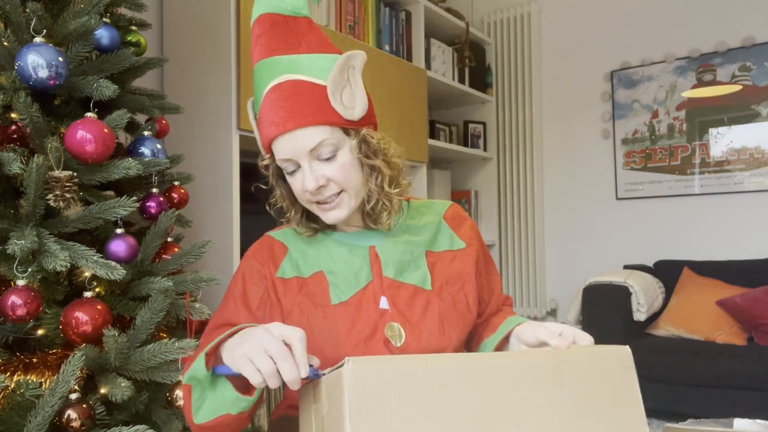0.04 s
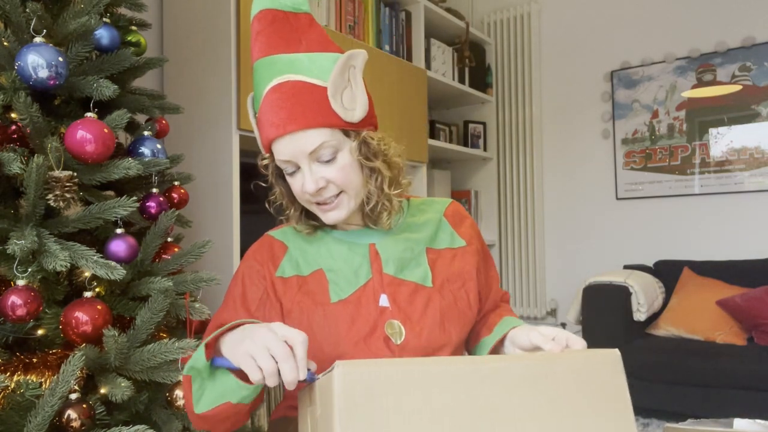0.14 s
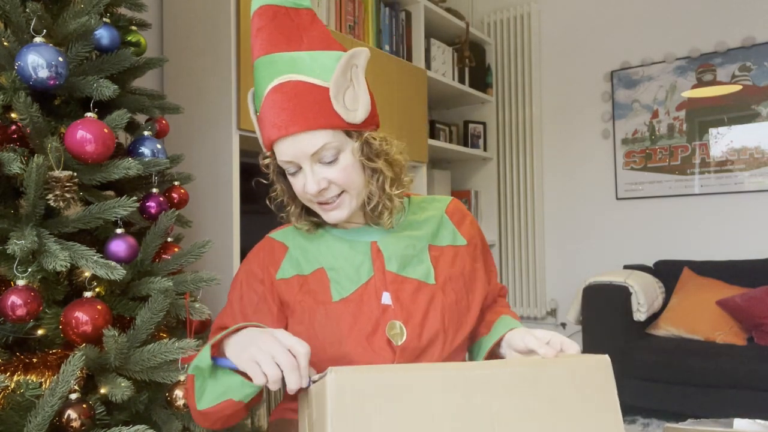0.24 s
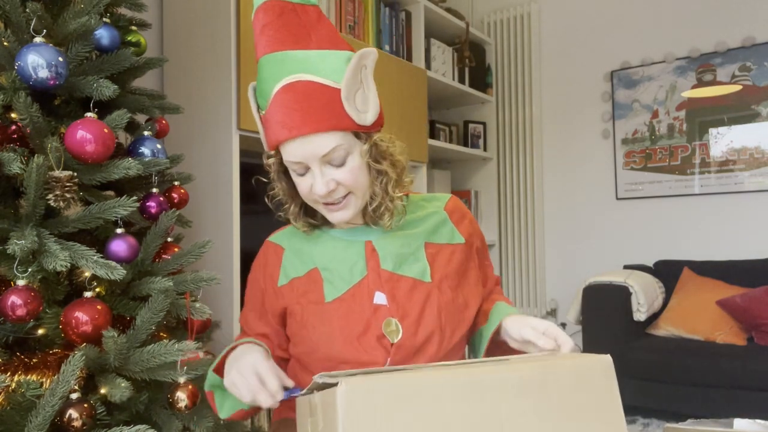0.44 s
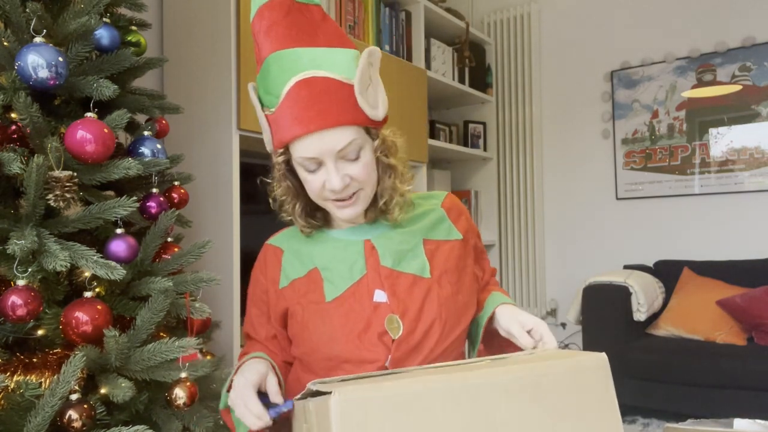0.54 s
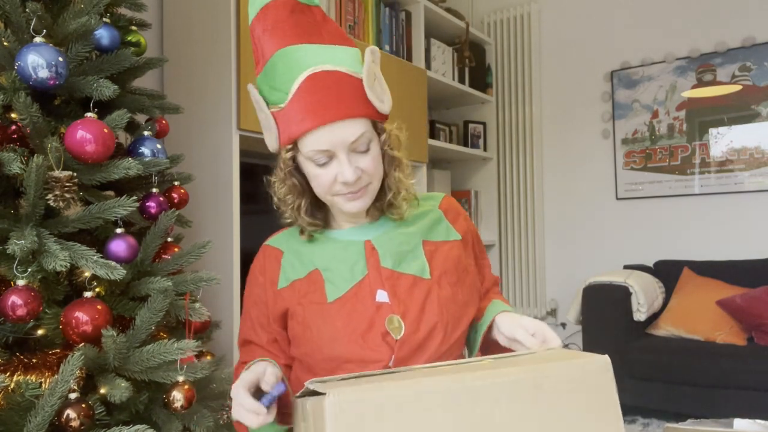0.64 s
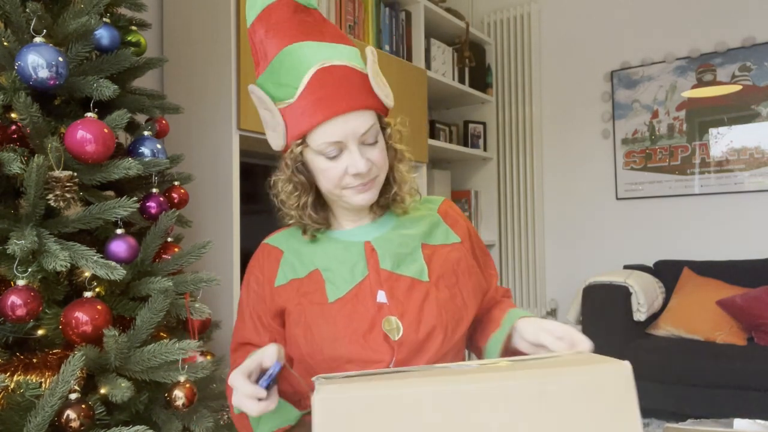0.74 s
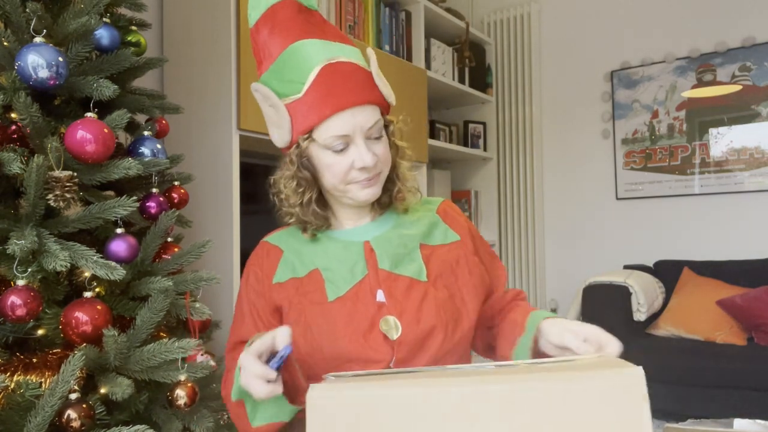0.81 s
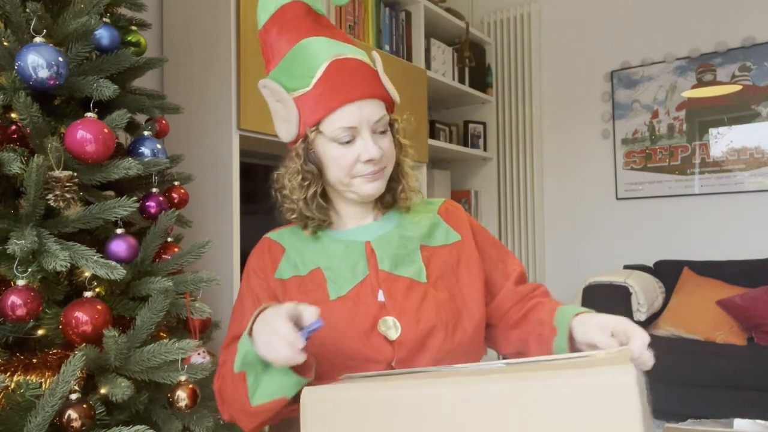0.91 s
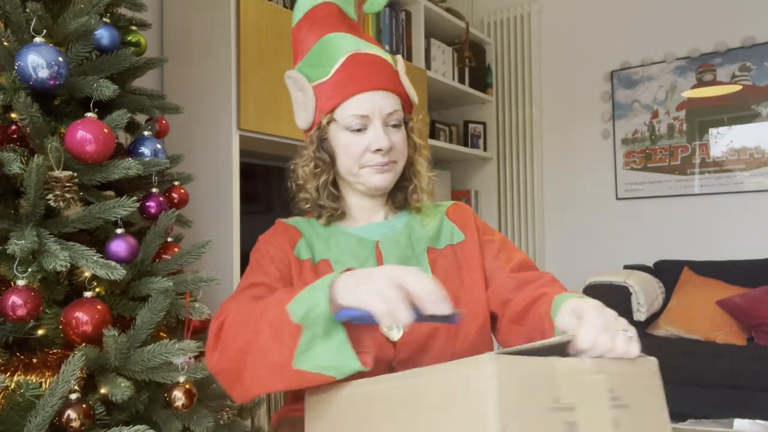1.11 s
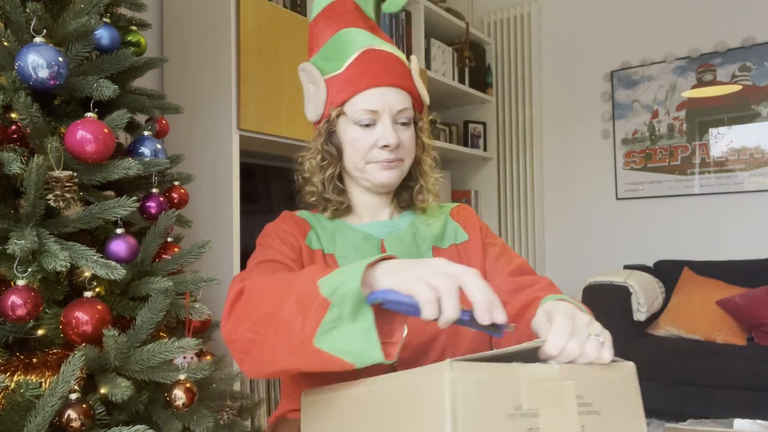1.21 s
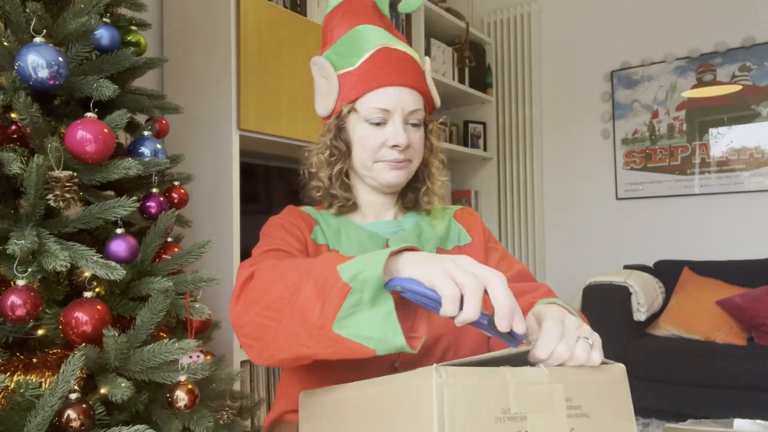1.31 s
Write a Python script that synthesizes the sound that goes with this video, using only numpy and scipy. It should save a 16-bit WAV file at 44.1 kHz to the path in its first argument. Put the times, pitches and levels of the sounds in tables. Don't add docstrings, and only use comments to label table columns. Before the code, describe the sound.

A blade jerks through a taped cardboard box, booming and snapping, then tape peels in fine ticks

```python
import sys
import numpy as np
from scipy import signal
from scipy.fft import rfft, irfft, next_fast_len
from scipy.io import wavfile
from scipy.ndimage import uniform_filter1d

SR = 44100
rng = np.random.default_rng(int(sys.argv[2]) if len(sys.argv) > 2 else 0)


def store_pcm(level_fs):
    pcm = np.round(np.clip(level_fs, -1, 1) * 32767).astype(np.int16)
    wavfile.write(sys.argv[1], SR, np.atleast_2d(pcm).T)


def level_to_linear(level):
    exponent = np.asarray(level, float) / 20
    return 10 ** exponent


N = 59535
CUTOFF_HZ = 15750


def rms_one(x):
    return x / np.sqrt(np.mean(x ** 2) + 1e-20)


def in_time(rows):
    s, *columns = np.transpose(rows)
    return [np.interp(np.arange(N) / SR, s, c) for c in columns]


def colour(x, spectrum):
    hz, db = np.transpose(spectrum)
    f = np.arange(N // 2 + 1) * SR / N + 1
    gain = level_to_linear(np.interp(np.log(f), np.log(hz), db))
    return irfft(rfft(x) * gain * (f < CUTOFF_HZ), N)


def band(x, hz, octaves, order=2):
    edges = hz * 2 ** (np.array([-.5, .5]) * octaves)
    edges = np.clip(edges, 30, [.34 * SR, .365 * SR])
    return signal.sosfilt(signal.butter(order, edges, "band", fs=SR, output="sos"), x)


def drift(rate_hz):
    r = np.exp(-2 * np.pi * rate_hz / SR)
    noise = rng.standard_normal(N + SR)
    return rms_one(signal.lfilter([1], [1, -2 * r, r * r], noise)[SR:])


def grains(per_s, spread_db, clump_db):
    sizes = level_to_linear(spread_db * np.minimum(rng.exponential(1, N), 4)) * rng.standard_normal(N)
    hits = rng.random(N) < per_s / SR
    return rms_one(sizes * hits * level_to_linear(clump_db * drift(81)) + 1e-9)


def strokes(rows, clicks, octaves):
    out, t = 0, np.arange(N) / SR
    rise_share = .25
    for s, length, db, from_hz, to_hz in rows:
        u = np.clip((t - s) / length, 0, 1)
        ramp = np.minimum(u / rise_share, (1 - u) / (1 - rise_share))
        swell = np.sin(np.pi / 2 * np.clip(ramp, 0, 1)) ** 0.83
        start = rms_one(band(clicks, from_hz, octaves, order=1))
        end = rms_one(band(clicks[::-1], to_hz, octaves, order=1))
        out = out + level_to_linear(db) * swell * (np.sqrt(1 - u) * start + np.sqrt(u) * end)
    return out


def rings(rows, cycles):
    out, t = np.zeros(N + SR), np.arange(SR // 50) / SR
    upper_ratio, upper_db = 1.39, -7.5
    for k, (s, db, hz) in enumerate(rows):
        decay = np.exp(-t * hz / cycles)
        fade = (1 - np.exp(-t * hz * 3.2)) * decay
        upper = level_to_linear(upper_db) * decay * np.sin(2 * np.pi * upper_ratio * hz * t)
        tone = np.sin(2 * np.pi * hz * t) + upper
        i = int(s * SR)
        out[i:i + len(t)] += (-1) ** k * level_to_linear(db) * 1.33 * fade * tone
    return out[:N]


# (f/Hz, level/dB)
HUSH_SPECTRUM = [(12, -25), (20, 11), (70, -3), (190, 0), (347, -1), (660, -38), (6010, -13.5),
                 (14300, -43), (16000, -35)]


def hush():
    return level_to_linear(-44.5 - 11.0) * rms_one(colour(rng.standard_normal(N), HUSH_SPECTRUM))


def room(x):
    t60_s, wall_cut_hz = 0.36, 4700
    size = next_fast_len(N + SR)
    w = 2 * np.pi * np.arange(size // 2 + 1) / size
    loss = 1 / (1 + (w * SR / (2 * np.pi * wall_cut_hz)) ** 2) ** 0.13
    echo = 0
    for k, lag in enumerate(rng.uniform(.008, .035, 10) * SR):
        g = level_to_linear(-60 * lag / SR / t60_s) * loss * np.exp(-1j * w * lag)
        echo = echo + (-1) ** k * g / (1 - g)
    return irfft(rfft(x, size) * echo, size)[:N] / 3


# (start t/s, length t/s, level/dB, start f/Hz, end f/Hz)
BLADE_HISSES = [
    (0.323, .09, -42.5, 4830, 4900),
    (.331, 0.079, -41, 1477, 1460),
    (0.042, 0.064, -55, 4900, 4700),
]


def hisses(clicks):
    return strokes(BLADE_HISSES, clicks, octaves=.1)


# (start t/s, length t/s, level/dB, start f/Hz, end f/Hz)
TAPE_CRACKLES = [
    (.04, 0.086, -52, 4940, 4900),
    (.33, 0.049, -48, 4700, 4900),
    (.43, 0.13, -43.5, 8340, 6300),
    (.83, 0.091, -48, 8700, 8000),
    (1.105, 0.089, -43, 6030, 5730),
    (1.16, 0.18, -45.5, 5670, 5900),
    (1.04, 0.048, -47.5, 5530, 5060),
    (1.093, 0.019, -44.5, 5000, 3180),
    (1.256, .016, -49, 5430, 6040),
]


def crackles(clicks):
    return strokes(TAPE_CRACKLES, clicks, octaves=.62)


# (start t/s, length t/s, level/dB, start f/Hz, end f/Hz)
BOARD_RUBS = [
    (.139, 0.036, -43.5, 1700, 1000),
    (.142, 0.024, -46.5, 600, 1300),
    (.302, 0.063, -35.5, 955, 1670),
    (.669, 0.0093, -39, 1270, 1460),
    (.676, 0.058, -49, 1420, 1850),
    (.79, 0.23, -57, 676, 1450),
    (.925, 0.063, -45, 2200, 2010),
    (.96, 0.13, -48, 1970, 1710),
    (1.091, 0.017, -44.5, 885, 1900),
    (1.246, 0.044, -50, 1480, 1160),
]


def rubs(clicks):
    return strokes(BOARD_RUBS, clicks, octaves=.45)


# (t/s, peak level/dB, f/Hz)
TAPE_TICKS = [(.0447, -31, 4940), (.0461, -32, 5060), (.0484, -32, 7000), (.0525, -30, 5130),
              (.0632, -32, 5380), (.4148, -25, 8150), (.4438, -22, 8790), (.4529, -21, 9000),
              (.5004, -39, 5900), (.5237, -24, 5890), (1.0547, -33, 5730), (1.0626, -31, 6500),
              (1.0937, -25, 6640), (1.117, -29, 5600), (1.1283, -32, 6080), (1.1328, -28, 6700),
              (1.1388, -34, 6040), (1.1488, -26, 5840), (1.152, -27, 6130), (1.1571, -35, 6720),
              (1.1613, -33, 6290), (1.1710, -34, 6000), (1.1725, -27, 6200), (1.1752, -34, 5200),
              (1.1775, -32, 4350), (1.187, -39, 7780), (1.1906, -33, 6520), (1.1992, -31, 5570),
              (1.2063, -37, 7890), (1.22, -31, 6700), (1.2266, -23.5, 6400), (1.2319, -30, 6730),
              (1.2415, -36, 5800), (1.2537, -33, 7740), (1.2601, -26, 6010), (1.2651, -26, 5810),
              (1.2683, -37, 6280), (1.292, -32, 8000)]


def ticks():
    return rings(TAPE_TICKS, cycles=1.7)


# (t/s, peak level/dB, f/Hz)
BOARD_SLIPS = [(.0105, -25.5, 2350), (.2785, -24, 750), (.2845, -24, 716), (.3132, -24, 908),
               (.3165, -16.5, 840), (.3195, -25, 1500), (.3210, -18.5, 1050), (.3243, -27, 742),
               (.3265, -21.5, 1110), (.3300, -27, 1370), (.3375, -22, 1500), (.6705, -40, 1390),
               (.6712, -31, 2690), (.6725, -34.5, 4260), (.2198, -19, 9300), (.9175, -34, 2280),
               (.924, -37, 2480), (.9385, -37, 2100), (.9513, -29, 2250), (.9625, -28, 2210),
               (.9665, -26.5, 2130), (.9783, -40, 2080), (.984, -42, 1910), (.9905, -34, 1840),
               (1.0002, -31, 1810), (1.0063, -34, 2090), (1.0158, -32, 1570), (1.0358, -37, 1980),
               (1.0985, -30, 4400), (.0433, -27, 4880)]


def slips():
    return rings(BOARD_SLIPS, cycles=2.73)


# (t/s, peak level/dB, centre f/Hz, width/octaves)
TAPE_SNAPS = [(.0100, -24, 3530, 1.5), (.0168, -25, 4160, 2.8), (0.0345, -25, 11000, 1.5),
              (0.0435, -22, 7000, 0.94), (.1228, -28, 5630, 1.26), (.1280, -32, 11900, 0.79),
              (.1365, -41, 14000, 1), (.1915, -22.5, 11100, 0.68), (.2195, -8.5, 10600, 1.04),
              (.2198, -8.5, 2920, 3.5), (.2272, -20, 11800, 0.51), (.383, -23, 10600, 0.74),
              (0.4264, -25, 7000, 2.5), (.4505, -22.5, 4930, 1.6), (.466, -27, 6100, 0.92),
              (0.524, -46, 6300, 0.84), (.6700, -27, 3000, 2.2), (0.6929, -27, 6600, 0.95),
              (0.749, -38, 7850, 1.7), (0.8929, -27.5, 2390, 0.72), (1.0158, -25, 2940, 2),
              (1.1001, -25, 3860, 2.6), (1.0892, -29, 6500, 1.3), (1, -36, 5000, 1.8),
              (1.2830, -33, 13000, 1.1), (1.1482, -25, 6000, 0.94), (1.1965, -28.5, 5400, 1),
              (1.227, -40, 7100, 2.7), (1.260, -33, 3480, 1.5), (1.283, -24, 8860, 4.4)]


def snaps():
    snap_s, tail_s, tail_db = .0005, .005, -16
    out, t = np.zeros(N + SR), np.arange(SR // 25) / SR
    fade = np.exp(-t / snap_s) + level_to_linear(tail_db) * np.exp(-t / tail_s)
    for s, db, hz, octaves in TAPE_SNAPS:
        noise = rng.standard_normal(len(t)) + 2.7 * (t == 0)
        burst = band(noise * fade, hz, octaves)
        i = int(s * SR)
        out[i:i + len(t)] += level_to_linear(db) * burst / np.abs(burst).max()
    return out[:N]


# (f/Hz, level/dB)
SCRAPE_SPECTRUM = [(300, 4), (800, 6.5), (2000, 5), (4000, 0.5), (9000, 3), (11000, -4.5), (14000, 0),
                   (16000, -6)]
# (t/s, level/dB, brightness/dB added to the bright part and taken off the
DRAG_CURVE = [(0, -46.5, -3), (.012, -37.5, -1.5), (.09, -51, 2), (.182, -41.5, -1.5), (.192, -32.5, -2.5),
              (.224, -29, -4), (.275, -35.5, -2.5), (.322, -26.5, -6), (.345, -42.5, 0.5), (.4, -43, -7),
              (.45, -40, -4), (.53, -47.5, -5), (.6, -55.5, 1.5), (.78, -45.5, 1), (.88, -38.5, -1.5),
              (1.05, -49.5, 3), (1.29, -53, -2), (1.33, -56.5, -0.5)]


def scrape():
    level_db, tilt_db = in_time(DRAG_CURVE)
    fibres = rms_one(colour(grains(14000, 2.0, 1.0), SCRAPE_SPECTRUM))
    dull = signal.sosfilt(signal.butter(1, 3200, fs=SR, output="sos"), fibres)
    bright = fibres - dull
    return level_to_linear(level_db - 0.55) * (dull * level_to_linear(-tilt_db) + bright * level_to_linear(tilt_db))


# (f/Hz, level/dB, decay by 60 dB t/s)
BOX_MODES = [(110, -7, 0.04), (170, -14, 0.042), (211.5, -1.5, 0.056), (266, -2.5, 0.053),
             (352, -1.5, 0.062), (428, -8.5, 0.022), (507, -14.5, 0.056), (755, -26, 0.047),
             (902, -13, 0.037), (1125, -14, 0.028), (1485, -13, 0.049)]


def box(force):
    out = 0
    for k, (hz, db, t60) in enumerate(BOX_MODES):
        r, w = level_to_linear(-60 / (t60 * SR)), 2 * np.pi * hz / SR
        mode = signal.lfilter([0, np.sin(w)], [1, -2 * r * np.cos(w), r * r], force + 1e-18)
        out = out + (-1) ** k * level_to_linear(db) * mode
    return out


# (t/s, peak level/dB, f/Hz)
WALL_KNOCKS = [(.0076, -23, 197), (0.0203, -34, 262), (0.191, -26.5, 193), (.1905, -25, 400),
               (0.253, -25, 300), (0.2592, -26.5, 270), (.277, -21, 302), (.220, -19.5, 316),
               (.293, -13.5, 308), (0.3055, -4.5, 337), (.3132, -13.5, 330), (.3165, -21, 333),
               (.3197, -9, 380), (0.326, -3, 272.5), (.339, -16.5, 320), (0.35, -19, 298),
               (.361, -21.5, 278), (0.3784, -23, 330), (0.428, -22.5, 347), (0.447, -32.5, 185),
               (0.5147, -17, 384), (.514, -27.5, 800), (0.5228, -31, 527), (0.5376, -43, 188.4),
               (0.5476, -32, 454), (0.528, -35, 111), (.531, -34, 566), (0.009, -28, 87.4),
               (.0100, -29, 343), (.0360, -37.5, 403), (.19, -24.5, 98), (0.322, -32, 115),
               (0.5556, -28, 398), (0.61, -30, 247), (0.665, -33, 192), (1.101, -41.5, 353),
               (1.282, -38, 214)]


def knocks():
    cycles, box_db = 4.58, -16.5
    edge_db, edge_ratio = -17.5, 2.36
    swing, push, t = np.zeros(N + SR), np.zeros(N + SR), np.arange(SR // 8) / SR
    for s, db, hz in WALL_KNOCKS:
        i = int(s * SR)
        turns = t * hz
        shape = turns * np.exp(1 - turns * 7.3 / cycles) * 5.79 / cycles
        wave = np.sin(2 * np.pi * turns)
        edge = level_to_linear(edge_db) * np.exp(-turns * 1.4) * np.sin(2 * np.pi * edge_ratio * turns)
        swing[i:i + len(t)] -= level_to_linear(db) * (shape * wave + edge)
        push[i:i + len(t)] += level_to_linear(db) * hz / SR * 1.8 * wave * (turns < 1)
    return swing[:N] + level_to_linear(box_db) * box(push[:N])


# (t/s, level/dB)
SHAKE_CURVE = [(0, -37), (.03, -43), (.1, -61), (.183, -42), (.195, -31.5), (.28, -23), (.31, -16.5),
               (.33, -21), (.37, -25), (.43, -48), (.5, -57), (.55, -47), (.65, -47.5), (.745, -56.5),
               (.93, -47.5), (1.0, -58.5), (1.29, -55.5), (1.35, -70)]


def shudder():
    level_db, = in_time(SHAKE_CURVE)
    jerks = band(grains(400, 2.0, 0.0), 330, 3.4)
    boom = rms_one(box(jerks))
    evenness = np.sqrt(uniform_filter1d(boom ** 2, size=1500) + 0.028)
    return level_to_linear(level_db - 3.5) * boom / evenness


def scene():
    coarse, fine = grains(4000, 1.8, 3.0), grains(6000, 1.5, 1.5)
    soft = hisses(fine) + crackles(fine) + rubs(coarse) + ticks() + slips()
    soft = soft + scrape() + knocks() + shudder()
    soft = signal.sosfilt(signal.cheby2(12, 40, CUTOFF_HZ + 250, fs=SR, output="sos"), soft)
    near = signal.sosfilt(signal.butter(2, 65, "high", fs=SR, output="sos"), soft + snaps())
    return (near + level_to_linear(-13) * room(near) + hush())[None]


def roll_off(x):
    return signal.sosfilt(signal.butter(12, 17010, fs=SR, output="sos"), x)


def record(dry):
    mix = signal.sosfilt(signal.cheby2(16, 60, 17000, fs=SR, output="sos"), dry)
    return roll_off(mix)


dry = scene()
out = record(dry)
store_pcm(out)
```